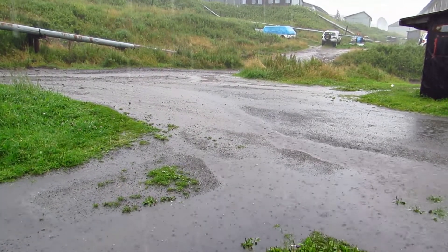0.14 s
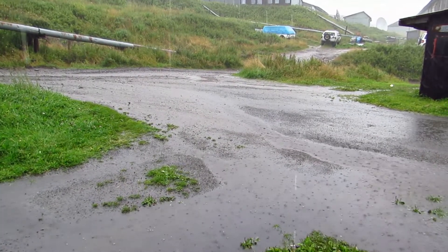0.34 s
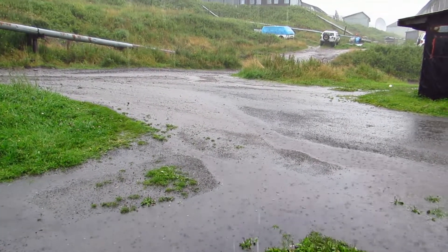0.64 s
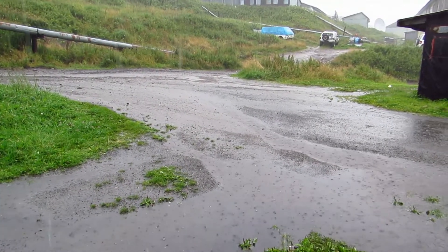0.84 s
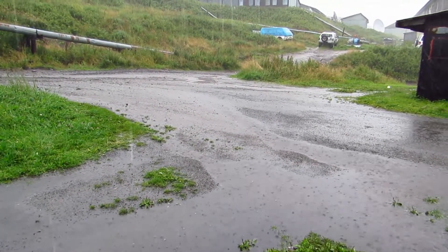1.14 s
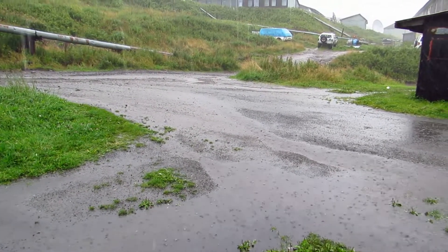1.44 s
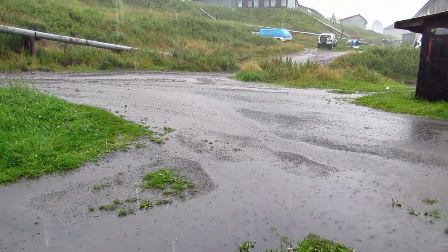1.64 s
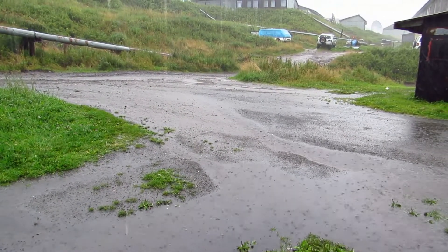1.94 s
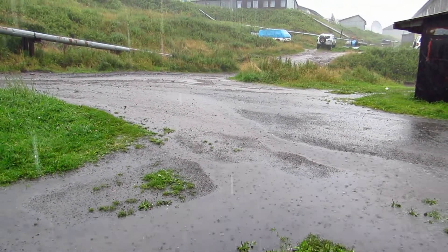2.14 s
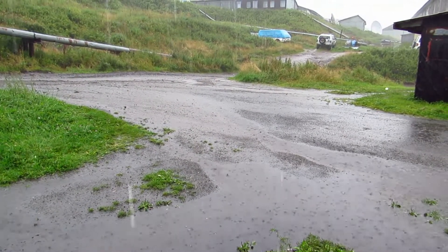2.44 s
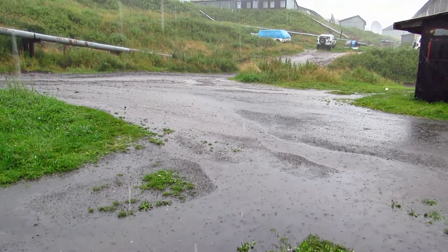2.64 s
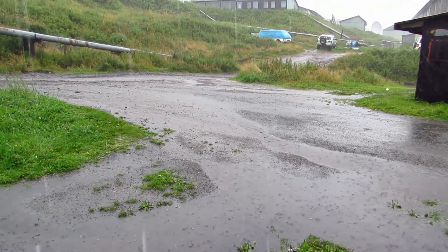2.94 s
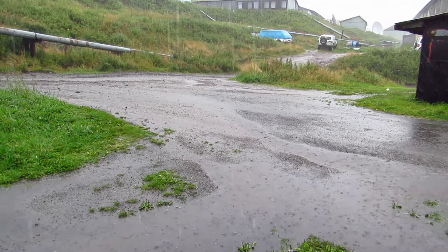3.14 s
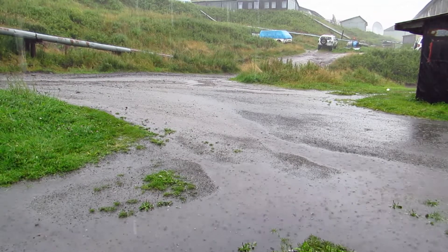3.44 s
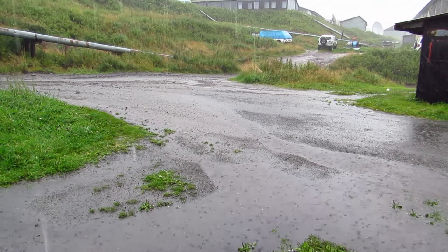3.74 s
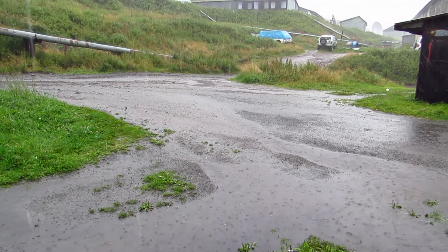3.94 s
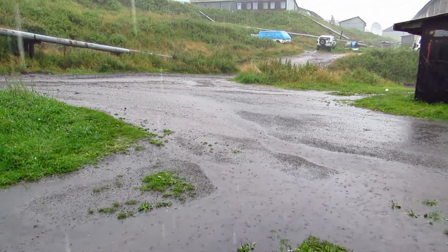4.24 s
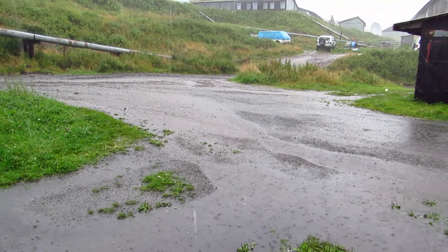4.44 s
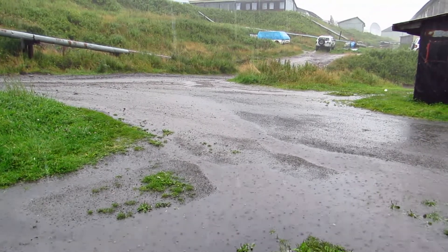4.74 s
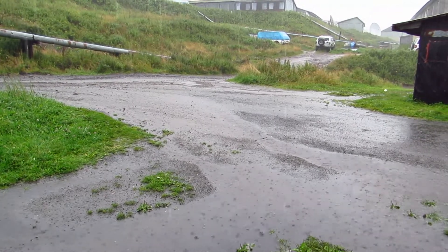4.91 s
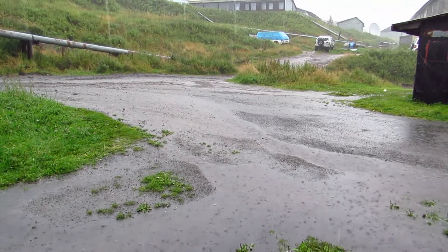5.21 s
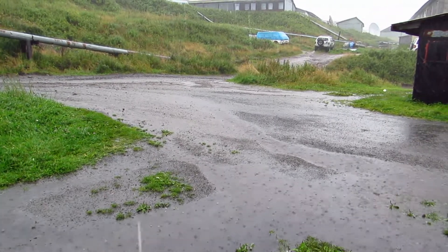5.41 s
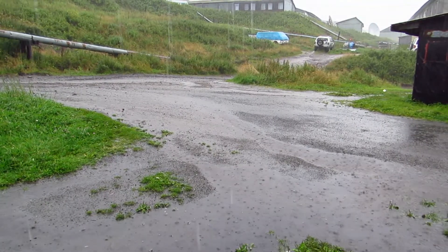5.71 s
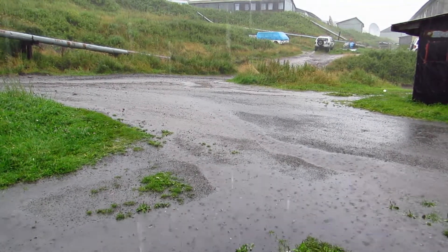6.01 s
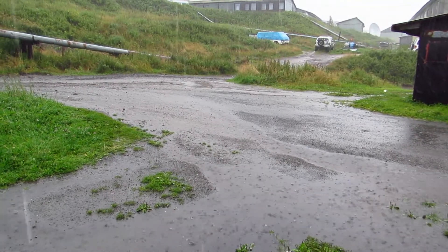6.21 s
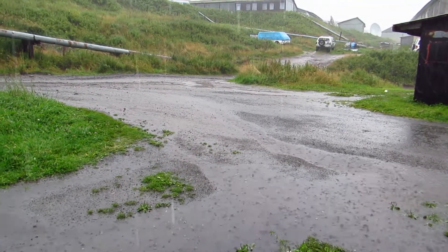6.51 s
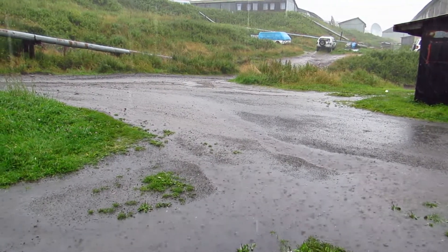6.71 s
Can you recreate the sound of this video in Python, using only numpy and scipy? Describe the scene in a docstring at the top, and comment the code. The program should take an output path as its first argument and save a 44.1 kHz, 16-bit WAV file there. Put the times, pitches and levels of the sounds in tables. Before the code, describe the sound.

Continuous rainfall outdoors, no wind or traffic. Far drops blur into an even hiss with a low, slightly boxy body; nearer drops crackle crisply over a film of water. Many sharp spats fall irregularly close to the microphone, a few dry snaps hit the threshold, and puddle drops give short bubbly plops. Density drifts gently, thinning twice and growing fullest at the end. Close doorway walls add very quick echoes.

```python
"""Steady rain on a wet asphalt yard with shallow puddles, heard from a doorway, about 6.9 s.
From the start: a far wash of noise bands, a ringing film of water, ticking patter, tiny bubble pings, dry ticks.
Fat drops smack from 0.01 s as banded pulses, puddle plops join at 0.15 s as slap and bubble, sharp ticks at 0.8 s.
The rain thins near 3 s, thickens near 4 s, thins again near 5.6 s and is densest at the end.
Throughout, walls echo the near splashes and colour the low end; a limiter ducks hard smacks, then recovers."""
import sys
import numpy as np
from scipy import signal
from scipy.io import wavfile
from scipy.ndimage import uniform_filter1d

SR = 44100
rng = np.random.default_rng(int(sys.argv[2]) if len(sys.argv) > 2 else 0)


def to_wav(sig):
    """Store sig (one row per channel, or 1-D mono) as 16-bit WAV at the path in sys.argv[1].

    Samples outside -1..1 are clipped; the rate is SR.
    """
    pcm = np.clip(np.atleast_2d(sig), -1, 1) * 32767
    pcm = np.round(pcm).astype(np.int16)
    wavfile.write(sys.argv[1], SR, pcm.T)  # frames by channels


N = 302658

# Shower strength. Each row: time in seconds, far reference level in dB, near reference level in dB.
SHOWER_LEVELS = [(0.0, -27, -23.5), (0.4, -26, -25.5), (0.85, -25.5, -22.5), (1.2, -26.5, -22.5),
                 (1.5, -26.5, -23), (1.9, -27, -24), (2.35, -27, -24.5), (2.85, -28, -27.5),
                 (3.2, -27.5, -27), (3.45, -28, -24.5), (3.9, -25, -25), (4.7, -27.5, -24),
                 (5.2, -26, -24.5), (5.6, -27, -27), (6.2, -25, -24), (6.86, -23.5, -23)]
# Far wash spectrum. Each row: frequency in Hz, relative density in dB per Hz.
WASH_SPECTRUM = [(20, -35), (40, -9.5), (90, -12.5), (170, 1.5), (300, -3.5), (430, 0), (650, 2),
                 (1000, -2.5), (1500, 2), (2200, -4), (3300, -3), (6000, -2.5), (12000, -1.5),
                 (16000, -9.5)]
# Small drops in the film of water. Each row: pitch in Hz, relative level in dB.
FILM_SPECTRUM = [(700, -6), (1000, -5.5), (1600, -4.5), (2500, -2), (3500, 0.5), (5000, 1), (7000, 5.5)]
# Near patter spectrum. Each row: frequency in Hz, relative density in dB per Hz.
PATTER_SPECTRUM = [(800, -12.5), (1500, -12), (2300, -4), (3300, -8.5), (5000, -3), (7500, 1.5),
                   (10000, -1), (14000, 8)]
# Fat drops close by, levels ahead of doorway and limiter. Each row: start in seconds, level in dB over SMACK_S,
# lower band edge in Hz, upper band edge in Hz, straight path in dB on the scale of the wall echoes.
FAT_DROPS = [(0.011, -15, 4430, 8650, -6), (0.063, -23, 1900, 6000, -2), (0.146, -14, 6500, 13000, -11),
             (0.213, -21.5, 2800, 5000, -8), (0.257, -20, 8000, 13000, -8), (0.337, -24, 4400, 6540, -4),
             (0.385, -32, 2600, 4230, -6), (0.494, -16.5, 3240, 6700, -2), (0.574, -22, 8500, 13100, -1),
             (0.663, -20, 8000, 13000, -12), (0.767, -18, 3400, 9000, -6), (0.785, -35, 3000, 3700, -10),
             (0.840, -16, 4900, 12200, -12), (0.853, -20, 8000, 12000, -13), (0.891, -24, 5500, 13000, -8),
             (0.912, -17.5, 6000, 10000, -12), (0.977, -18.5, 7700, 11500, -19),
             (1.051, -23, 2990, 6000, 4), (1.109, -14.5, 10000, 13000, -14), (1.172, -22, 3000, 6050, -12),
             (1.233, -19, 6500, 10100, -14), (1.275, -24, 4180, 6300, -8), (1.311, -15.5, 9600, 13700, -6),
             (1.33, -24, 4170, 6200, -10), (1.354, -19, 7500, 13000, -20), (1.421, -15, 4600, 11600, -11),
             (1.462, -17, 8200, 13000, -8), (1.506, -14, 4070, 7500, -7), (1.549, -25, 2600, 4200, -3),
             (1.66, -14, 4740, 10300, -6), (1.798, -19, 4520, 5500, -7), (1.817, -22, 4600, 5600, -1),
             (1.876, -15, 5500, 6660, 16), (1.919, -19, 9500, 13500, -8), (1.948, -17, 6300, 11900, -7),
             (1.987, -22, 6500, 8500, -10), (2.016, -25.5, 2640, 4200, -9), (2.139, -24, 6380, 7450, -14),
             (2.259, -20, 7400, 12200, -14), (2.434, -19, 2900, 6000, -3), (2.562, -24, 2980, 6500, -2),
             (2.591, -16.5, 6700, 12500, -17), (2.606, -31, 2000, 3800, -8), (2.756, -23, 5100, 7750, -8),
             (2.8862, -16, 3330, 6850, 0), (2.902, -13, 4100, 6740, 3), (2.9705, -16.5, 4770, 8500, 7),
             (3.007, -13, 5460, 6800, -8), (3.086, -20.5, 8060, 13000, -8), (3.172, -17.5, 3330, 10500, -6),
             (3.252, -18, 8150, 12100, -14), (3.275, -17, 4950, 10000, -12),
             (3.3376, -11.5, 3120, 10600, 1), (3.469, -19, 4500, 8000, 4), (3.549, -22.5, 6400, 8500, -16),
             (3.569, -20, 3200, 12000, -2), (3.665, -29, 2600, 4250, -6), (3.894, -19.5, 4970, 9000, -3),
             (3.9405, -13.5, 5600, 8000, 14), (4.0743, -12, 6030, 8300, -14),
             (4.122, -24.5, 2680, 3700, -11), (4.161, -11.5, 4370, 8900, -5),
             (4.175, -19.5, 3500, 7000, -4), (4.212, -28, 2800, 3800, -10), (4.295, -16, 4900, 9900, -12),
             (4.3105, -14, 6000, 12000, -8), (4.4552, -14.5, 2800, 5800, -2), (4.5042, -14, 2050, 5000, 3),
             (4.584, -24.5, 3200, 4800, 6), (4.538, -22, 6500, 13000, -8), (4.664, -22, 6000, 9000, -10),
             (4.778, -22, 4170, 6200, -6), (4.833, -19.5, 2800, 6550, -9), (4.861, -30.5, 2700, 4000, -6),
             (4.887, -15.5, 7940, 12400, -17), (4.937, -21.5, 6500, 8050, -6),
             (5.085, -24.5, 2580, 3980, -6), (5.1565, -15, 3420, 8600, -11), (5.282, -21, 6000, 9000, -2),
             (5.476, -23, 3480, 12100, -15), (5.506, -16.5, 4730, 11100, -24),
             (5.516, -18, 5900, 8950, -12), (5.604, -17, 8000, 13000, -10),
             (5.639, -15.5, 6500, 13000, -13), (5.7423, -12, 5240, 12000, -3),
             (5.812, -18.5, 8000, 13000, -10), (5.844, -23, 4230, 6500, -8), (5.899, -17, 3520, 6950, -4),
             (5.922, -17, 7500, 11600, -20), (5.969, -19, 8000, 13000, -8), (6.012, -19, 4500, 12500, -6),
             (6.037, -13, 3300, 12400, -7), (6.108, -18, 4200, 7500, -1), (6.124, -12.5, 4200, 8400, -1),
             (6.255, -16.5, 5960, 12700, 1), (6.453, -21, 2800, 5530, -9), (6.553, -12.5, 7050, 11700, -16),
             (6.59, -16, 3800, 7500, -6), (6.609, -15.5, 5500, 11000, -6), (6.771, -12, 2870, 6660, 6),
             (6.786, -15.5, 5500, 11000, -6)]
# Drops into puddles, levels ahead of doorway and limiter. Each row: start in seconds, level in dB over SMACK_S,
# bubble pitch in Hz, bubble ring against the slap in dB.
PUDDLE_DROPS = [(0.146, -23.5, 1620, -5), (0.146, -35, 890, -6), (0.757, -28, 1050, -8),
                (0.977, -28, 950, -5), (1.094, -29, 1480, -4), (1.504, -28, 2870, 0), (1.505, -30, 970, 1),
                (1.9, -24.5, 3000, 8), (2.014, -29, 1580, 0), (2.089, -26, 850, -2),
                (2.09, -26.5, 1700, -12), (2.383, -29, 2200, -1), (2.604, -23.5, 2530, -2),
                (2.61, -28, 2250, 0), (2.921, -28, 874, 0), (3.327, -24.5, 1990, 3), (3.722, -25, 1554, 11),
                (3.989, -27, 1970, 5), (4.313, -21.5, 1650, 18), (4.628, -28, 3550, 2.5),
                (5.633, -28.5, 2140, -2), (6.237, -22.5, 1040, -1), (6.319, -29.5, 680, 3),
                (6.344, -28, 2000, 2), (6.419, -23, 2070, 3), (6.542, -21.5, 1540, 2),
                (6.551, -26, 930, -1)]
# Sharpest drops on the threshold. Each row: start in seconds, onset level in dB ahead of doorway and limiter.
THRESHOLD_DROPS = [(0.8277, -7), (0.9192, -7), (1.0652, -8), (1.2387, -8), (1.3592, -10), (1.4703, -7),
                   (1.484, -11), (2.759, -8), (2.83, -9), (4.316, -7), (4.361, -11), (5.1235, -9),
                   (5.927, -5)]
# Likeness of left and right. Each row: frequency in Hz, correlation (no unit).
STEREO_LIKENESS = [(40, 0.4), (200, 0.97), (450, 0.61), (750, 0.79), (1200, 0.57), (3500, 0.63),
                   (6500, 0.65), (9000, 0.077), (15000, 0.076)]
# Echoes off the doorway. Each row: delay in seconds, level in dB.
WALL_ECHOES = [(.0044, -1), (.0067, 1.5), (.0088, -4), (0.0113, -10)]
# Doorway resonances. Each row: frequency in Hz, width in Hz, left gain in dB, right gain in dB.
DOORWAY_MODES = [(287, 77, 6, 6), (453, 73, 0, -33), (690, 153, 4.5, 3.5), (1235, 130, 5, 2.5),
                 (1584, 170, 3, 4.5), (2050, 52, 2, 2), (3290, 1300, 5.5, 4.5), (7420, 620, 1, 1)]
# Treble notches of the recorder. Each row: frequency in Hz, width in Hz.
TREBLE_NOTCHES = [(3925, 360), (7880, 220)]

SMACK_S = .01  # level reference of a smack; also the limiter's averaging time
LIMIT_DB, LIMIT_SHARE, RELEASE_DB_PER_S, ATTACK_S = -15.5, 0.92, 3.5, .022
ROLLOFF_HZ, CUTOFF_HZ = 14200, 15700


def from_db(db):
    """Decibels to amplitude gain."""
    return 10 ** (np.asarray(db) / 20)


def rms_one(x):
    """Scale to an rms of 1."""
    return x / np.sqrt(np.mean(x ** 2) + 1e-20)


def in_time(rows):
    """Interpolate each column at every sample."""
    s, *columns = np.transpose(rows)
    return [np.interp(np.arange(N) / SR, s, column) for column in columns]


def at_hz(points, hz):
    """Interpolate a spectrum on a log-frequency axis."""
    points_hz, values = np.transpose(points)
    return np.interp(np.log(hz), np.log(points_hz), values)


def likeness(hz):
    """Left-right correlation at a frequency."""
    return np.clip(at_hz(STEREO_LIKENESS, hz), -1, 1)


def add(out, sound, start_s):
    """Mix a stereo sound in at a time."""
    i = int(np.clip(round(start_s * SR), 0, N - 1))
    out[:, i:i + sound.shape[1]] += sound[:, :N - i]


def delayed(x, s):
    """The same signal, later."""
    return np.pad(x, (max(round(s * SR), 0), 0))[:len(x)]


def drift(knots_per_s):
    """Random curve, linear between knots, rms 1."""
    knots = rng.standard_normal(1024)
    return rms_one(np.interp(np.arange(N) / SR * knots_per_s, np.arange(len(knots)), knots))


def band_noise(low_hz, high_hz, size):
    """Stereo band noise of rms 1; mid and side are weighted to set the left-right correlation."""
    low_hz = np.clip(low_hz, 10, .4 * SR)
    high_hz = np.clip(high_hz, 1.1 * low_hz, .45 * SR)
    band = signal.butter(2, [low_hz, high_hz], "band", fs=SR, output="sos")
    settle = 4000  # samples dropped while the filter settles
    mid, side = signal.sosfilt(band, rng.standard_normal((2, size + settle)))[:, settle:]
    alike = likeness(np.sqrt(low_hz * high_hz))
    return rms_one(np.sqrt(1 + alike) * mid + np.sqrt(1 - alike) * side * [[1], [-1]])


def wash(flicker_db):
    """Far drops, too many to tell apart: half-octave noise bands that each flicker; rms 1."""
    edges_hz = np.geomspace(18, 17000, 21)
    out = 0
    for low_hz, high_hz in zip(edges_hz, edges_hz[1:]):
        level_db = at_hz(WASH_SPECTRUM, np.sqrt(low_hz * high_hz)) + flicker_db * drift(60)
        out = out + from_db(level_db) * np.sqrt(high_hz - low_hz) * band_noise(low_hz, high_hz, N)
    return rms_one(out)


def arrivals(when_s, level_db, straight_db, scatter, hz, size):
    """Stereo clicks: each impact comes straight and off every wall, over randomly varied paths."""
    delay_s, arrival_db = np.transpose([(0, straight_db)] + WALL_ECHOES)
    path, lag, sign, side = rng.uniform(-1, 1, (4, np.size(when_s), len(delay_s)))
    at = ((when_s + delay_s * (1 + scatter * path)) * SR).astype(int)
    strength = np.sign(sign) * from_db(level_db + arrival_db)
    alike = likeness(hz)
    clicks = np.full((2, size), 1e-18)
    clicks[:, at % size] += np.sqrt(1 + alike) * strength
    # the opposed left-right part lags by up to half a cycle
    across = np.sqrt(1 - alike) * strength * np.sign(side)
    lag_samples = np.round(abs(lag) * SR / hz / 2).astype(int)
    clicks[:, (at + lag_samples) % size] += [across, -across]
    return clicks


def dribble(per_s, spread_db, cycles):
    """Small drops in the film of water: each excites a resonance falling 60 dB in `cycles`; rms 1."""
    out, pitches_hz = 0, np.geomspace(760, 7500, 24)
    for hz in pitches_hz:
        when, size = rng.random((2, int(per_s * N / SR / len(pitches_hz)), 1))
        size_db = at_hz(FILM_SPECTRUM, hz) + spread_db * np.minimum(-np.log(size), 1.6)
        clicks = arrivals(when * N / SR, size_db, straight_db=0, scatter=.4, hz=hz, size=N)
        ringing = signal.iirpeak(hz, np.pi * cycles / np.log(1000), fs=SR)
        out = out + signal.lfilter(*ringing, clicks) / np.sqrt(hz)
    return rms_one(out)


def smack(clicks, low_hz, high_hz):
    """Each click becomes a short pressure pulse within a band; rms 1."""
    low_hz = np.clip(low_hz, 100, .38 * SR)
    high_hz = np.clip(high_hz, 1.1 * low_hz, .45 * SR)
    band = signal.butter(2, [low_hz, high_hz], "band", fs=SR, output="sos")
    return rms_one(signal.sosfilt(band, clicks))


def patter(per_s, spread_db, narrow_octaves, wide_octaves):
    """Near drops at random, each a banded tick; small ones and high pitches are most common; rms 1."""
    out, pitches_hz = 0, np.geomspace(1400, 13000, 42)
    for k, hz in enumerate(pitches_hz):
        count = int(per_s * N / SR * hz / pitches_hz.sum())
        when, size = rng.random((2, count, 1))
        size_db = spread_db * np.minimum(-np.log(size), 2.6)
        clicks = arrivals(when * N / SR, size_db, straight_db=-4, scatter=.3, hz=hz, size=N)
        width_octaves = wide_octaves if k % 3 else narrow_octaves
        reach = 2 ** (width_octaves / 2)
        level = from_db(at_hz(PATTER_SPECTRUM, hz)) * np.sqrt(hz)
        out = out + level * smack(clicks, hz / reach, hz * reach)
    return rms_one(out)


def bubble(hz, cycles, rise_per_s, echo_db, size=SR // 20):
    """A trapped bubble: a sine falling 60 dB in `cycles`, pitch rising at rise_per_s, with wall echoes."""
    t = np.arange(size) / SR
    decay = np.exp(-np.log(1000) * hz * t / cycles)
    ring = np.sin(2 * np.pi * hz * t * (1 + rise_per_s * t / 2)) * decay
    paths = rng.uniform(.85, 1.2, len(WALL_ECHOES))  # delays depend on where it lies
    echoes = sum(from_db(db) * delayed(ring, s * path) for (s, db), path in zip(WALL_ECHOES, paths))
    return ring + from_db(echo_db) * echoes


def pings(per_s, spread_db):
    """Tiny bubbles all over the puddles, each with its own pitch and side; rms 1."""
    out = np.zeros((2, N))
    for when, size, pitch, side in rng.random((int(per_s * N / SR), 4)):
        hz = 5000 + 7500 * pitch
        size_db = spread_db * min(-np.log(size), 2.5) + 10 * np.log10(pitch + .15)
        pan_db = 8 * (side - .5) * np.array([[1], [-1]])
        ring = bubble(hz, cycles=62, rise_per_s=4, echo_db=2, size=SR // 40)
        add(out, from_db(size_db + pan_db) * ring, when * N / SR)
    return rms_one(out)


def snap(low_hz):
    """A small drop on hard ground: one dry, bright burst of decaying noise."""
    t = np.arange(SR // 200) / SR
    return np.exp(-t / .00022) * band_noise(low_hz, 14300, len(t))


def ticks(per_s, range_db):
    """Small drops at random on the threshold, too close for an echo."""
    out = np.zeros((2, N))
    for when, size, pitch in rng.random((int(per_s * N / SR), 3)):
        add(out, from_db(-range_db * size) * snap(3500 + 5000 * pitch), when * N / SR)
    return out


def splash_shape(impacts, straight_db, burst_s, spray_db, spray_s):
    """Splash envelope: a short burst and a faint tail of spray, repeated by each wall; powers add."""
    power = impacts ** 2
    paths = [(0.0027, straight_db)] + WALL_ECHOES
    arriving = sum(from_db(db) ** 2 * delayed(power, s) for s, db in paths) + 1e-18
    burst, spray = (signal.lfilter([1], [1, -np.exp(-1 / (s * SR))], arriving) for s in (burst_s, spray_s))
    return np.sqrt(burst + from_db(spray_db) ** 2 * spray)


def fat_drops(crack_db, spray_db, ring_db):
    """Close drops: a banded pulse with a thin crack, a little spray and the ring of a small bubble."""
    out, size = np.zeros((2, N)), SR // 20
    impact = signal.unit_impulse(size)
    for start_s, db, low_hz, high_hz, straight_db in FAT_DROPS:
        hz = np.sqrt(low_hz * high_hz)
        clicks = arrivals(0, 0, straight_db, scatter=.04, hz=hz, size=size)
        crack = smack(np.roll(clicks, SR // 4000, axis=1), 7000, 14000)  # 0.25 ms late
        pulse = smack(clicks, low_hz, high_hz) + from_db(crack_db) * crack
        shape = splash_shape(impact, straight_db, burst_s=.0006, spray_db=-19, spray_s=.004)
        spray = rms_one(shape * band_noise(low_hz, high_hz, size))
        ring = rms_one(bubble(hz, cycles=30, rise_per_s=0, echo_db=-straight_db))
        splash = pulse + from_db(spray_db) * spray + from_db(ring_db) * ring
        add(out, from_db(db) * np.sqrt(SMACK_S * SR / size) * rms_one(splash), start_s)
    return out


def plops(slosh_db, cycles, rise_per_s):
    """Square hits on a puddle: a compact slap, a little slosh, more or less of a large bubble."""
    out, size = np.zeros((2, N)), SR // 20
    shape = splash_shape(signal.unit_impulse(size), straight_db=3, burst_s=.0015, spray_db=-12, spray_s=.006)
    for start_s, db, hz, ring_db in PUDDLE_DROPS:
        low_hz, high_hz = .74 * hz, 1.35 * hz
        clicks = arrivals(0, 0, straight_db=1, scatter=.1, hz=hz, size=size)
        slap = smack(clicks, low_hz, high_hz)
        slosh = rms_one(shape * band_noise(low_hz, high_hz, size))
        water = rms_one(slap + from_db(slosh_db) * slosh)
        ring = rms_one(bubble(hz, cycles, rise_per_s, echo_db=-5.0))
        plop = rms_one(water + from_db(ring_db) * ring)
        add(out, from_db(db) * np.sqrt(SMACK_S * SR / size) * plop, start_s)
    return out


def sharp_ticks():
    """The few threshold drops that stand out of the patter, each a dry snap."""
    out = np.zeros((2, N))
    for start_s, db in THRESHOLD_DROPS:
        add(out, from_db(db) * snap(6000), start_s)
    return out


def doorway(x):
    """The recess lifts or hollows narrow bands; bass is lifted left, by the nearer wall, and cut right."""
    for hz, width_hz, left_db, right_db in DOORWAY_MODES:
        mode = signal.lfilter(*signal.iirpeak(hz, hz / width_hz, fs=SR), x)
        x = x + (from_db([[left_db], [right_db]]) - 1) * mode
    bass = signal.lfilter(*signal.butter(1, 800, fs=SR), x)
    return x + (from_db([[1.2], [-1.4]]) - 1) * bass


def limiter(x):
    """Gain eases down by most of the excess over the limit, then climbs back at a steady dB rate."""
    power = uniform_filter1d(np.mean(x ** 2, axis=0), int(SMACK_S * SR))
    level_db = 10 * np.log10(np.abs(power) + 1e-12)
    over_db = LIMIT_SHARE * np.maximum(level_db - LIMIT_DB, 0)
    climb_db = RELEASE_DB_PER_S * np.arange(N) / SR
    cut_db = np.maximum.accumulate(over_db + climb_db) - climb_db
    keep = np.exp(-1 / (ATTACK_S * SR))
    return x * from_db(-signal.lfilter([1 - keep], [1, -keep], cut_db))


def scene():
    """Far wash, near patter and single drops, all through the doorway."""
    far_db, near_db = in_time(SHOWER_LEVELS)
    far = from_db(far_db) * wash(flicker_db=1.13)
    film = from_db(far_db - 3) * dribble(per_s=400, spread_db=5.5, cycles=16)
    grain = patter(per_s=750, spread_db=5.6, narrow_octaves=.24, wide_octaves=1.05)
    spatter = from_db(near_db - 0.6) * grain
    fizz = from_db(near_db - 6.5) * pings(per_s=170, spread_db=4)
    snaps = from_db(near_db + 15) * ticks(per_s=10, range_db=9) + sharp_ticks()
    close = fat_drops(crack_db=-8, spray_db=-3, ring_db=-10)
    puddles = plops(slosh_db=-7, cycles=48, rise_per_s=1.2)
    return doorway(far + film + spatter + fizz + snaps + close + puddles)


def record(dry):
    """The recorder limits, rounds the highest peaks, notches two bands, rolls off the top and cuts it."""
    sound = .78 * np.tanh(limiter(dry) / .78)
    for hz, width_hz in TREBLE_NOTCHES:
        sound = signal.lfilter(*signal.iirnotch(hz, hz / width_hz, fs=SR), sound)
    dull = signal.sosfilt(signal.butter(12, ROLLOFF_HZ, fs=SR, output="sos"), sound)
    return signal.sosfilt(signal.cheby2(16, 60, CUTOFF_HZ, fs=SR, output="sos"), dull)


dry = scene()
out = record(dry)
to_wav(out)
```